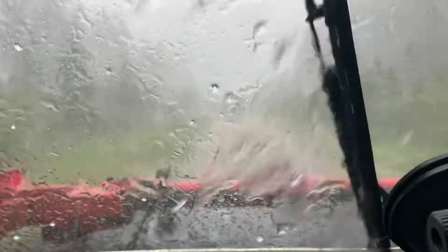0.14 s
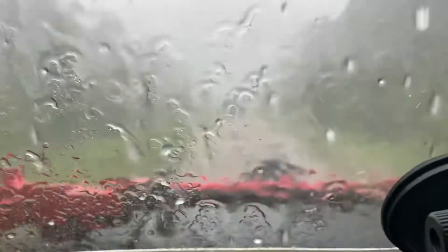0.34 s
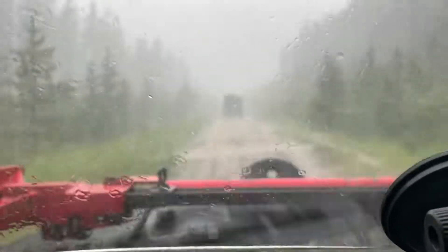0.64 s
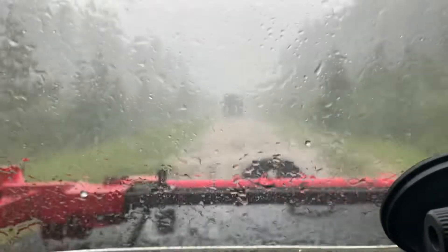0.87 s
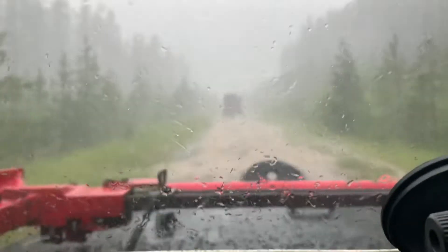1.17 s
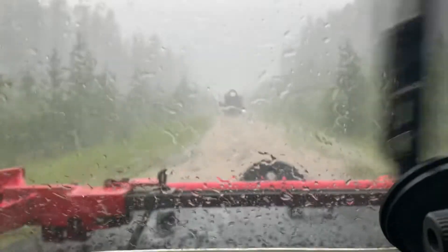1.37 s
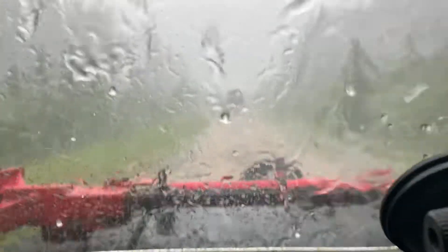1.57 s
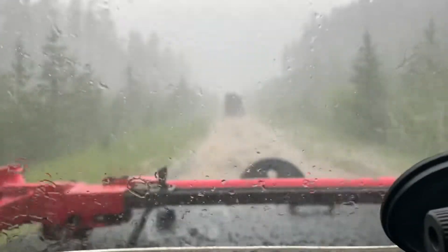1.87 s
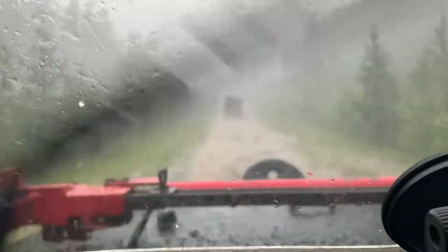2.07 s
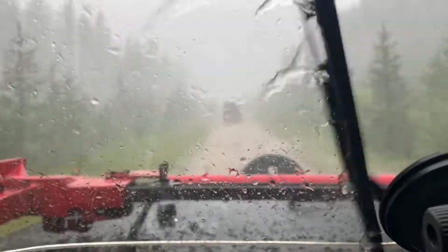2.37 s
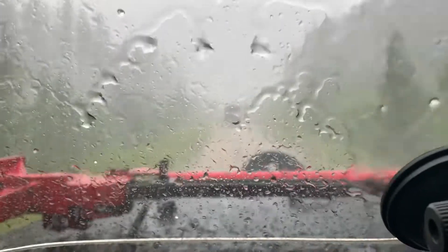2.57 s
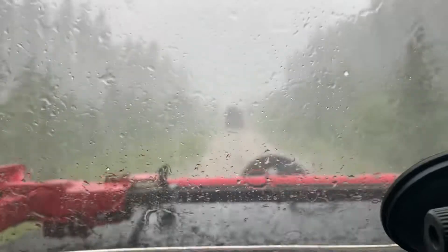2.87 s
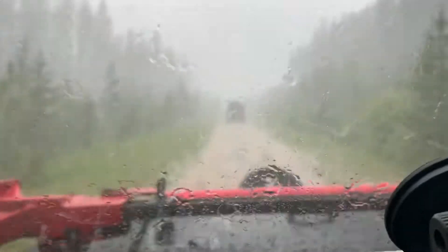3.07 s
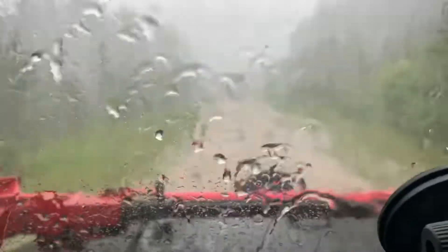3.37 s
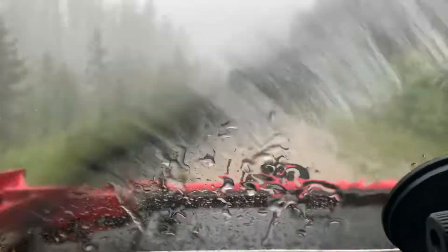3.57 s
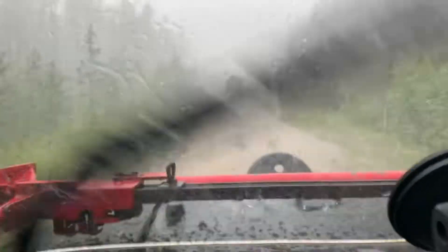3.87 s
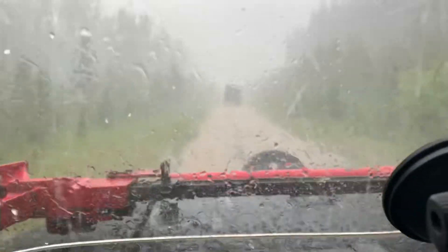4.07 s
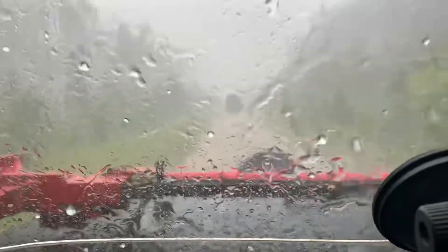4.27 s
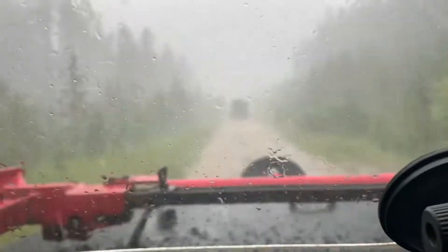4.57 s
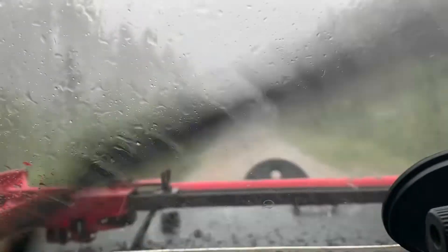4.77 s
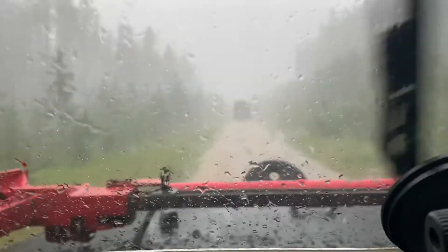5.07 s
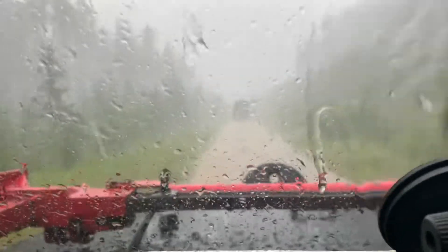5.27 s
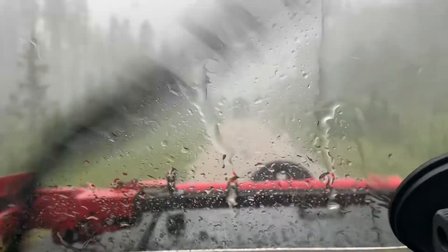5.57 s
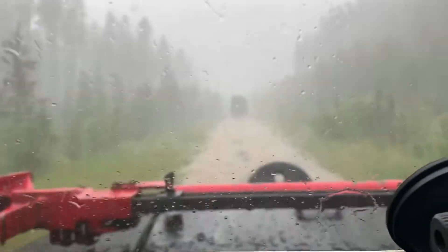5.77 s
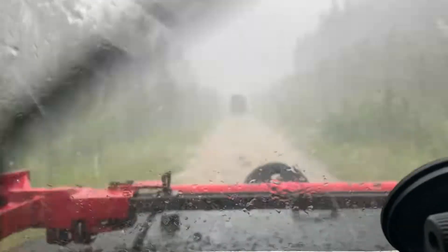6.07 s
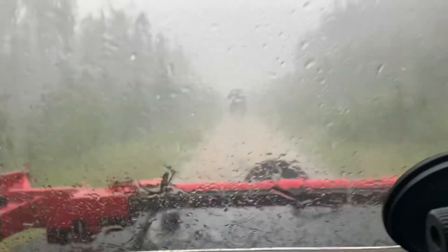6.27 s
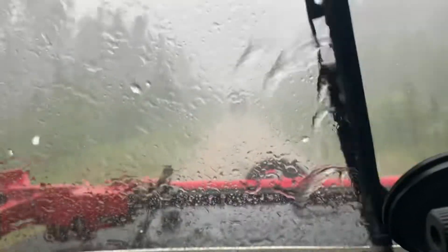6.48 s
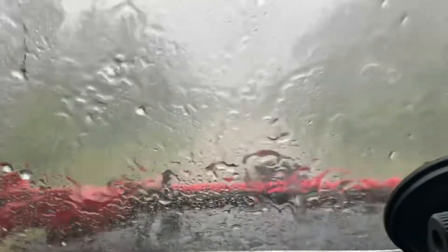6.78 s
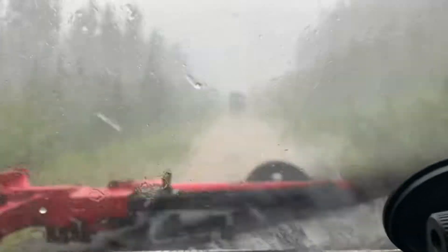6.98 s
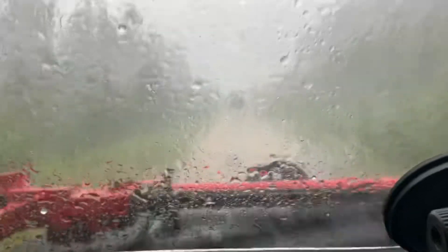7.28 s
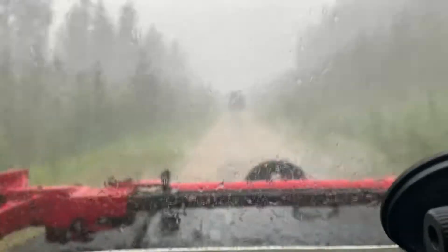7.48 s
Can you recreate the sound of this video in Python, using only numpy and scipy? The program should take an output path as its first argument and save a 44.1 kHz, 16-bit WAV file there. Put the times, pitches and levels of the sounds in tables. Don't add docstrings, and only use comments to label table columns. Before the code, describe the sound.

From inside a slow vehicle, sharp fat raindrops splat over dense hissing patter, with low engine boom, rut bumps and faint wiper knocks.

```python
import sys
import numpy as np
from scipy import signal
from scipy.fft import rfft, irfft
from scipy.io import wavfile
from scipy.ndimage import uniform_filter1d

SR = 44100
rng = np.random.default_rng(int(sys.argv[2]) if len(sys.argv) > 2 else 0)


def invert_db(level):
    return 10 ** (np.asarray(level, dtype=float) / 20)


def master_out(mix):
    frames = np.transpose(np.atleast_2d(mix))
    ceiling = np.clip(frames, -1, 1)
    pcm = np.round(ceiling * 32767).astype(np.int16)
    wavfile.write(sys.argv[1], SR, pcm)


N = 336483
T = np.arange(N) / SR
HZ = np.arange(N // 2 + 1) * SR / N + 1e-3
TOP_HZ = 15800


def unit(x):
    return x / np.sqrt(np.mean(x ** 2))


def over_hz(table, column):
    table = np.array(table)
    return np.interp(np.log(HZ), np.log(table[:, 0]), table[:, column])


def walk(rate):
    k = int(SR / rate)
    steps = np.repeat(rng.standard_normal(N // k + 1), k)
    return 1.3 * uniform_filter1d(uniform_filter1d(steps, k), k)[:N]


def port_noise(db, sway=0.):
    # frequency in Hz, likeness of the ports 0-1, lead of the right port in half turns.
    ports = [(60, 0.93, -0.00059), (299.54, 0.75, 0.139), (484.86, 0.05, 0.2), (639, 0.57, 1.04),
             (1508, 0.27, 0.7097), (2180, 0.3, 0.57), (2500, 0.34, 0.166), (3370, 0, 1.08),
             (4120, 0.18, -2.09), (5400, 0.03, 1.04), (6240, 0.34, 0.2), (7400, 0.35, 0.37)]
    # frequency in Hz, # likeness 0-1, lead in half turns.
    ports_top = [(7800, .99, .97), (9150, .993, 1.03), (10400, .98, 1.97), (11600, .98, 2.03),
                 (12600, .995, 2.98), (14300, .995, 3.02), (15100, .985, 4), (17000, .985, 4)]
    shared, left, right = rfft(rng.standard_normal((3, N)))
    like = np.clip(over_hz(ports + ports_top, 1), 0, 1)
    lead = np.pi * over_hz(ports + ports_top, 2)
    ahead = shared * np.exp(1j * lead)
    if sway:
        paths = []
        for s in (-sway, sway):
            swayed_lead = np.interp(HZ * (1 + s * (HZ > 6000)), HZ, lead)
            paths.append(irfft(shared * np.exp(1j * swayed_lead), N))
        mix = np.clip(.5 + 0.48 * walk(16), 0, 1)
        ahead = rfft(mix * paths[0] + (1 - mix) * paths[1])
    coherent = np.sqrt(like) * np.array([shared, ahead])
    diffuse = np.sqrt(1 - like) * np.array([left, right])
    return (coherent + diffuse) * invert_db(db)


def ruts(boom_hz=50.03, rise_s=0.025, rut_db=-4, spread=0.147):
    # start in seconds, peak level in dB.
    bumps = [(0.407, -18), (0.643, -18.5), (0.834, -15.5), (0.914, -24), (1.218, -11), (1.821, -26),
             (2.309, -29), (2.601, -11), (2.919, -17.5), (3.394, -16.5), (3.675, -17), (3.829, -12),
             (4.378, -15.5), (4.561, -21.5), (4.963, -18), (5.26, -21.5), (5.345, -17), (5.449, -21.5),
             (5.596, -22.5), (5.951, -16.5), (6.179, -18), (6.299, -19), (6.594, -14.5), (6.764, -11),
             (7.114, -13.5), (7.21, -13), (7.499, -12.5)]
    out = np.zeros(N)
    for s, peak_db in bumps:
        hz = boom_hz * (1 + spread * rng.uniform(-0.9825, 1))
        age = np.maximum(T - s, 0) / rise_s
        out += invert_db(peak_db + rut_db) * age * np.exp(1 - age) * np.sin(2 * np.pi * hz * (T - s))
    return out


def engine(wobble=0.01177, road_db=-30.0, lean_db=4.0, uneven_db=4.5, shake_db=1.0):
    # time in seconds, cycle rate in Hz, load in dB.
    revs = [(0, 15.454, -6), (.3, 16.2, -4.5), (.45, 16.28, -3), (.89, 16.6, -3), (1.4, 14.445, -3),
            (2.23, 14.4, 0), (2.5, 15.4, -4.5), (3.14, 15.7, -1.5), (3.75, 14.957, -3), (4.02, 16.1, -0.5),
            (4.68, 20.9, 0.5), (4.971, 18.2, -1.5), (5.31, 15.775, 0.5), (5.74, 15.8, -1), (6.1, 17.4, 1),
            (6.45, 16, 3), (7.01, 14.773, 0.5), (7.5, 16.5, 3.5), (7.63, 12.083, -4)]
    # multiple of the cycle rate, level in dB.
    orders = [(3, -32.5), (4, -32.5), (5, -41), (6, -41)]
    # frequency in Hz, level in dB per Hz.
    rumble = [(8.8, -36.5), (15, -8), (43, 6.5), (64, -0.5), (162, -9.5), (270, -19), (500, -30),
              (650, -43.5), (1100, -120)]
    s, *columns = np.transpose(revs)
    hz, load_db = (np.interp(T, s, c) for c in columns)
    boom = ruts()
    for order, db in orders:
        turns = np.cumsum(round(order) * hz * (1 + wobble * walk(9))) / SR
        level = np.sqrt(2) * invert_db(db + load_db + uneven_db * walk(7))
        boom = boom + level * np.sin(2 * np.pi * turns)
    road = unit(irfft(port_noise(over_hz(rumble, 1)), N))
    road = road * invert_db(load_db + road_db + shake_db * walk(5))
    return (boom + road) * invert_db(np.array([[-lean_db], [lean_db]]) / 2)


def knocks(t60=0.056, knock_db=-1, thud_db=-3):
    # start in seconds, peak level in dB, ring in Hz.
    blows = [
        (0.212, -19.5, 435.1),
        (0.61, -30, 344),
        (2.394, -31, 354),
        (3.224, -27, 730),
        (5.204, -25, 394),
        (5.21, -28, 395.6),
        (5.259, -34, 333.2),
    ]
    out = np.zeros(N)
    band = signal.butter(4, [280, 900], "band", fs=SR)
    thud = unit(signal.lfilter(*band, rng.standard_normal(N)))
    for s, peak_db, hz in blows:
        age = np.maximum(T - s, 0)
        ring = np.sin(2 * np.pi * hz * age) + invert_db(thud_db) * thud * (age > 0)
        out += invert_db(peak_db + knock_db) * ring * np.exp(-np.log(1000) * age / t60)
    return out * invert_db(np.array([[.6], [-.6]]))


def shower(lull_db=-49, lull_drum_db=7.5, crest_bend=1.94):
    # crest in seconds, spatter in dB, seconds to swell the last 10 dB, seconds to thin by 10 dB,
    # panel drumming relative to the spatter in dB.
    sheets = [(0.052, -29.5, -6.4546, 0.61, 0.5), (1.169, -29.5, 0.07, 0.14, 0),
              (1.482, -26, 0.206, 0.1838, 0), (1.74, -34.5, 0.13, 0.18, 0), (1.89, -36.5, 0.02, 0.2, -1.5),
              (2.05, -38, 0.03, 0.18, -1.5), (2.27, -36, 0.02, 0.12, 0), (2.43, -33, 0.07, 0.09, -0.5),
              (2.669, -29.5, 0.2, 0.4039, 1.5), (3.4, -48, -1.3, 0.2, 7.5), (3.651, -39, -0.0367, 0, -8.5),
              (3.738, -28.5, -0.0044, 0.1459, -0.5), (4.0, -28, 0.23, 0.2254, 2),
              (4.3, -36, 0.0869, 0.3, 4), (4.55, -32, 0.06, 0.3052, 0.5), (5.45, -36.5, 0.0545, 0.14, 2.5),
              (5.6, -42, -0.03, 1.32, 2), (5.75, -33, 0.044, 0.13, 1.5), (5.86, -31, 0.0744, 0.28, 3.5),
              (6.14, -31.5, 0.04, 0.22, 1.5), (6.561, -28, 0.0547, 0.0738, -1),
              (6.77, -26, 0.1648, 0.1143, 1), (6.95, -35, 0.25, 0.38, 0), (7.546, -23.5, 0.04, .6, -2)]
    power = invert_db(lull_db + np.array([[0], [lull_drum_db]])) ** 2
    for crest_s, db, swell_s, thin_s, drum_db in sheets:
        away = np.abs(T - crest_s) / np.where(T < crest_s, abs(swell_s), abs(thin_s))
        level_db = np.maximum(db - 10 * away ** crest_bend, -99)
        power = power + invert_db(level_db + np.array([[0], [drum_db]])) ** 2
    return 10 * np.log10(power)


def pings(sheet, per_s=220., ping_db=-4, spread_db=3, low_hz=701.0, octaves=3.0, cycles=40., fall_db=-.5):
    when, pitch, size, side = rng.random((round(per_s * N / SR), 4)).T
    start = (when * (N - 2048)).astype(int)
    hz = low_hz * 2 ** (octaves * pitch)
    age = np.arange(2000)
    gain = invert_db(sheet[start] + ping_db + fall_db * octaves * pitch - spread_db * np.log(size + .12))
    turns = hz[:, None] * age / SR
    onset = np.sin(np.minimum(turns / 2, np.pi / 2)) ** 2
    decay = np.exp(-np.log(1000) * turns / cycles)
    ring = gain[:, None] * np.sin(2 * np.pi * turns) * decay * onset
    out = np.zeros((2, N))
    for port, near in enumerate((side, 1 - side)):
        at = (start + np.round(30 * (1 - near)).astype(int))[:, None] + age
        heard = np.sqrt(.5 + near)[:, None] * ring
        out[port] = np.bincount(at.ravel(), heard.ravel(), N)
    return out


def fade(hits, decay_ms):
    for ms in (decay_ms, .5):
        keep = np.exp(-1000 / (ms * SR))
        hits = signal.lfilter([1 - keep], [1, -keep], hits)
    return hits


def rain_noise():
    # frequency in Hz, level in dB per Hz, left minus right in dB.
    colour = [(100.1, 10.5, 2), (179.4, 0.2, -1.5), (319, -2, -2), (633.8, -5, 1), (791, -6, 0.9),
              (1217.4, -8, 0.03), (2533.7, -8, 0), (2826, -9.5, 0), (6210, -13, -3.5), (7560, -13, 0.9),
              (9250, -9, -3), (11906, -12.5, 1.2), (13700, -16.5, -2), (17428, -14, 6)]
    # mode in Hz, width in Hz, lift in dB.
    panels = [(117.5, 15.8, 4), (254.1, 15, 2.5), (393.2, 83, 2), (793, 32, 5.5), (1387.1, 63, 4),
              (2559, 112, 3), (3350, 275, 1.5), (4576, 309.2, 3)]
    tilt = np.array([[1], [-1]]) * over_hz(colour, 2) / 2
    modes = sum(db / (1 + (2 * (HZ - hz) / width) ** 2) for hz, width, db in panels)
    noise = port_noise(over_hz(colour, 1) + modes + tilt, sway=0.03)
    return noise * HZ ** 4 / (HZ ** 4 + 99.0 ** 4) * (HZ < TOP_HZ)


def big_drops():
    # start in seconds, peak level in dB, dull part in dB, fizz
    # in dB.
    splats = [(0.0149, -22, -30, -28), (0.1101, -13.5, -33, -23.5), (0.176, -12, -34, -23),
              (0.2059, -13, -30.5, -24.5), (0.2738, -22.5, -29, -27), (0.3187, -11.5, -32, -22),
              (0.3187, -19, -28.5, -16), (0.3511, -23, -39, -32), (0.3586, -20.5, -35, -26),
              (0.3995, -16, -34, -22), (0.4708, -15, -28, -24), (0.539, -18, -31.5, -23),
              (0.5596, -14.5, -26, -22), (0.6, -21, -36, -26.5), (0.626, -12.5, -30, -21),
              (0.6871, -22, -29.5, -30), (0.827, -19.5, -48, -38.5), (0.9677, -28, -39, -38),
              (1.0034, -19, -33.5, -29.5), (1.0247, -21.5, -34.5, -28), (1.0372, -10, -31.5, -24),
              (1.061, -13, -29, -30), (1.0811, -14, -28, -25), (1.1614, -8, -31, -23),
              (1.2002, -14, -35, -28.5), (1.2226, -19, -29, -25), (1.33, -15, -29, -25),
              (1.3443, -11, -29, -24), (1.4007, -16, -37, -20.5), (1.4491, -7, -29, -18),
              (1.5718, -11, -25.5, -17), (1.6695, -20, -31, -28), (1.7155, -20, -33, -34.5),
              (1.7404, -8, -28, -23), (1.8337, -23, -31, -28), (1.8547, -26.5, -40, -29),
              (1.8736, -17.5, -32.5, -20.5), (2.0113, -19, -38, -26), (2.0412, -16, -34.5, -23),
              (2.1066, -19, -42.5, -26.5), (2.1485, -19, -41, -35.5), (2.166, -11, -37, -30),
              (2.2189, -18, -36.5, -32), (2.2243, -10.5, -30, -30), (2.2528, -10, -25, -20.5),
              (2.296, -17, -29, -24), (2.33, -14, -37, -22), (2.385, -19, -31, -35),
              (2.5253, -8, -27, -22), (2.5637, -15, -27.5, -24.5), (2.5796, -11, -31, -24.5),
             (2.6136, -12, -26, -28), (2.656, -10, -27.5, -28.5), (2.8036, -16, -28, -29.5),
             (2.867, -22.5, -29, -31), (2.8989, -20, -34.5, -34.5), (2.9568, -24.5, -35, -31),
             (3.0241, -18, -34.5, -32), (3.0466, -16, -34.5, -27), (3.1533, -28.5, -34, -37),
             (3.1848, -17, -34, -29), (3.2227, -22, -33.5, -33.5), (3.3469, -22, -47, -29),
             (3.3908, -27, -47.5, -34.5), (3.4706, -19, -36.5, -25), (3.5105, -15.5, -41, -24.5),
             (3.5754, -9, -28.5, -29.5), (3.6313, -16.5, -32, -25), (3.6896, -13.5, -28, -26),
             (3.7146, -13, -23, -21), (3.732, -15.5, -30.5, -25), (3.7704, -13.5, -35, -24),
             (3.8692, -10, -25, -16), (3.9924, -15, -38, -18), (4.0483, -13, -38, -22),
             (4.0757, -8, -32, -21), (4.1601, -17.5, -32, -22), (4.199, -18, -33.5, -26),
             (4.2783, -19, -30, -17), (4.3257, -22, -37, -28), (4.4095, -26, -38, -29),
             (4.4095, -22, -35, -25), (4.4429, -13, -29, -21), (4.4858, -14, -38, -20.5),
             (4.4968, -8, -28.5, -21.5), (4.5143, -9, -31, -21), (4.5362, -3.5, -28, -28),
             (4.5636, -12.5, -32, -25), (4.5731, -13, -30.5, -22.5), (4.611, -22.5, -31, -30.5),
             (4.645, -19.5, -31.5, -30), (4.6889, -12, -27, -19.5), (4.7348, -21, -29.5, -22),
             (4.7782, -11, -29, -21), (4.9692, -29, -48, -36), (4.9932, -25, -38, -32),
              (5.2605, -30, -32.5, -33.5), (5.3478, -21, -41, -32.5), (5.3877, -27, -36, -41),
             (5.4156, -22, -45.5, -32.5), (5.4306, -14, -35, -25.5), (5.5525, -14, -36.5, -23),
             (5.5783, -14, -35, -30.5), (5.6246, -22, -39, -36), (5.6396, -11, -33.5, -34),
             (5.6596, -18, -36, -29), (5.6794, -20, -40, -30), (5.6985, -17.5, -31.5, -26),
             (5.7244, -17.5, -26, -26.5), (5.7738, -18, -39, -26), (5.7977, -14, -30.5, -20),
             (5.8162, -11.5, -28.5, -16.5), (5.9631, -10, -31, -20.5), (5.9908, -23.5, -36, -30.5),
             (5.9998, -21.5, -34, -25), (6.0297, -13.5, -31, -18.5), (6.0562, -12, -32, -23),
             (6.0836, -17.5, -34, -27.5), (6.113, -4, -29, -26), (6.2198, -17, -32, -26),
             (6.3335, -19, -32.5, -30.5), (6.381, -15, -33, -40), (6.4441, -19, -36, -29),
             (6.4525, -15.5, -30.5, -26.5), (6.4631, -21, -28, -27), (6.5015, -7, -28, -17.5),
             (6.5306, -16, -25, -24), (6.561, -9, -20.5, -28.5), (6.658, -4, -23.5, -27),
             (6.802, -16.5, -24, -27), (6.8352, -17, -26, -31.5), (6.9052, -10, -25, -22),
             (6.986, -20, -31.5, -27.5), (7.022, -14, -28, -19.5), (7.0417, -20.5, -32, -32),
             (7.0669, -24.5, -32.5, -32), (7.0793, -21, -29.5, -30), (7.1908, -25, -32, -34),
             (7.2031, -20, -31, -38), (7.3024, -18.5, -32, -27.5), (7.438, -16.5, -33, -34),
             (7.4668, -3.5, -29.5, -28), (7.5019, -13, -26.5, -23), (7.5158, -11.5, -24, -19)]
    # start in seconds, peak level in dB, dull part in dB, fizz in dB.
    drips = [(0.7442, -25.5, -36, -30), (0.7652, -27.5, -43, -31.5), (0.846, -21, -54, -36),
             (0.9842, -24, -36.5, -37), (1.955, -22, -41.5, -34), (2.0644, -23, -34, -37),
             (2.1929, -24, -35, -30), (2.3114, -19, -30, -29), (3.1532, -29.5, -36, -36),
             (3.3984, -27.5, -45, -33), (3.4286, -30, -45, -37), (3.6405, -18, -26.5, -30),
             (3.6664, -20.5, -34.5, -30.5), (4.8362, -28.5, -34, -35), (4.9504, -32.5, -46, -40),
             (5.0241, -20, -36.5, -39), (5.1238, -35, -48, -43.5), (5.201, -34, -39, -47),
             (5.3642, -24, -36, -35), (6.4734, -23.5, -31.5, -36), (6.4838, -14.5, -33, -25),
             (7.326, -28, -40, -39), (7.4135, -29, -38, -40)]
    return np.transpose(splats + drips)


def rain(drops_per_s=260., mist=0.33, flicker_db=1.65, splat_db=-15.5, tail_share=0.021, tail_ms=37.0,
         big_fizz_db=-1, big_drum_db=-2, drift_db=0.73, crack_share=0.29, crack_ms=.9, crack_hz=2420.0,
         thin_tilt=0.23, stray_share=.03, masked=10., hue_db=1.5, dull_db=0.5):
    # upper edge in Hz, splat decay in ms, spread of drop sizes in dB,
    # own share of each drop's size in dB.
    parts = [
        (298, 8.8, 2.5, 2),
        (865.47, 9.915, 2, 2),
        (1790, 3.7, 0, 2.5),
        (3890, 6, 1, 6),
        (7620, 5.3, 3, 9.5),
        (12580, 3.1, 6, 7.5),
        (16477, 2.7, 6, 2),
    ]
    sheet, drum = shower()
    thinness = np.minimum(sheet - (-33), 0)
    fizz_db = 1.5 + 0.28 * thinness + drift_db * walk(10)
    drum_db = -0.4 + drum - sheet + drift_db * walk(9)
    density = drops_per_s * invert_db(.6 * (sheet - sheet.mean())) / SR
    falls = np.flatnonzero(rng.random(N) < density)
    size = np.minimum(rng.exponential(size=len(falls)), 1.9)
    own = rng.standard_normal((len(parts), len(falls)))
    noise = rain_noise()
    scale = np.sqrt(np.mean(irfft(noise.mean(axis=0) * (HZ > 1200) * (HZ < 7000), N) ** 2))
    when, peak_db, big_dull, big_fizz = big_drops()
    at = (when * SR).astype(int)
    hue = rng.uniform(-1.9, 1, (len(when), len(parts))).T
    out, below = pings(sheet), 0
    for k, (edge_hz, decay_ms, spread_db, own_db) in enumerate(parts):
        under = 1 / (1 + (HZ / edge_hz) ** 12)
        carrier = irfft(noise * np.sqrt(np.maximum(under - below, 0)), N) / scale
        below = under
        low, glassy, high = edge_hz < 1000, edge_hz > 5000, edge_hz > 9000

        hits = np.zeros(N)
        hits[falls] = invert_db(spread_db * size + own_db * np.clip(own[k], -2, 2)) ** 2 / density[falls]
        patter = fade(hits / hits.mean(), decay_ms)
        steady_db = sheet + low * drum_db + high * fizz_db + glassy * thin_tilt * thinness
        steady = invert_db(steady_db + flicker_db * walk(15)) ** 2

        if high:
            part_db = big_fizz + big_fizz_db
        elif glassy:
            part_db = peak_db + splat_db
        else:
            part_db = big_dull + dull_db + low * big_drum_db
        power = invert_db(part_db + hue_db * hue[k]) ** 2
        big = np.zeros(N)
        big[at] = power ** 2 / (power + steady[at]) * decay_ms * SR / 1000
        crack = crack_share * np.clip(edge_hz / crack_hz - 1, 0, 1) * fade(big, crack_ms)
        big = fade(big, decay_ms) + tail_share * fade(big, tail_ms)

        lone = crack + stray_share * big
        apart = np.array([np.roll(carrier[0], N // 3), np.roll(carrier[1], N // 5)])
        out = out + carrier * np.sqrt(steady * (mist + (1 - mist) * patter) + big)
        out = out + apart * lone / np.sqrt(lone + masked * steady)
    return out


def scene():
    return engine() + knocks() + rain()


def roll_off(x):
    return signal.sosfilt(signal.butter(12, 16780, fs=SR, output="sos"), x)


def record(dry):
    rounded = np.tanh(0.65 * dry) / 0.76
    phone = irfft(rfft(rounded) / (1 + (HZ / (TOP_HZ + 250)) ** 200), N)
    return roll_off(phone)


dry = scene()
out = record(dry)
master_out(out)
```